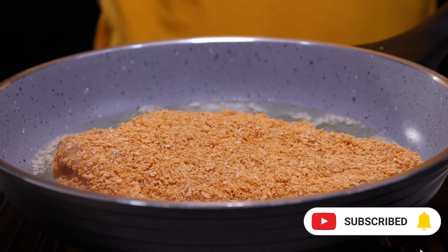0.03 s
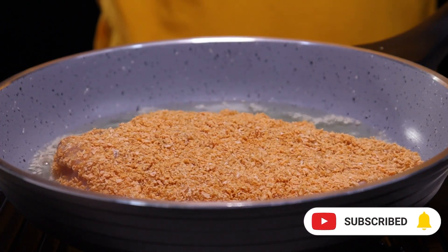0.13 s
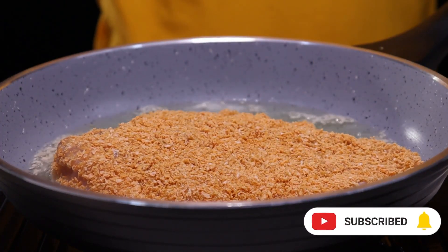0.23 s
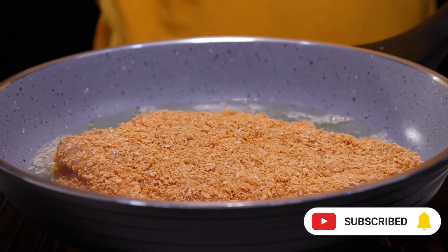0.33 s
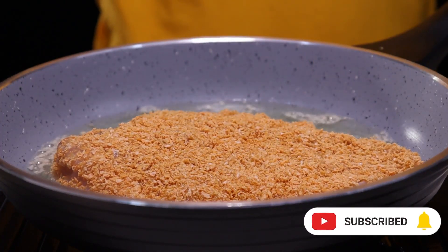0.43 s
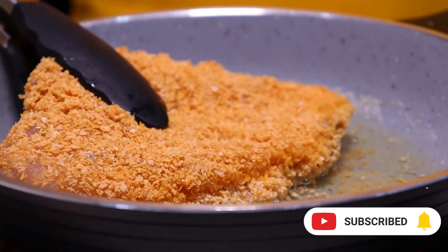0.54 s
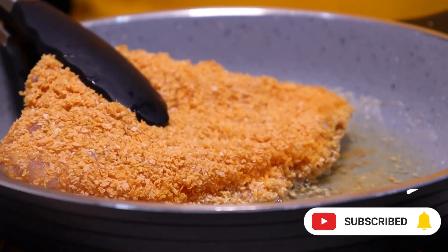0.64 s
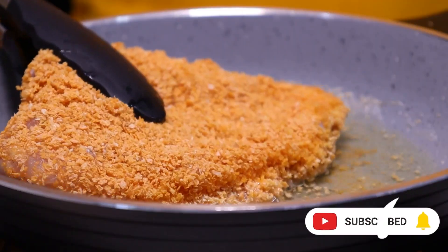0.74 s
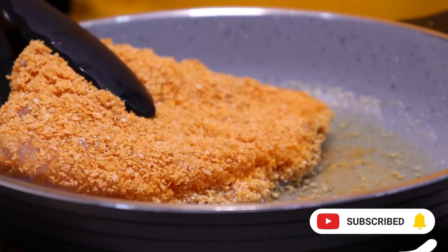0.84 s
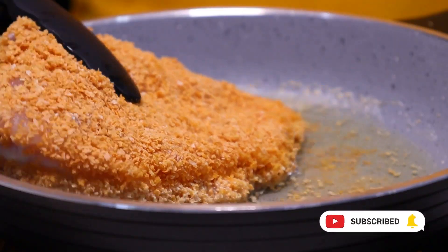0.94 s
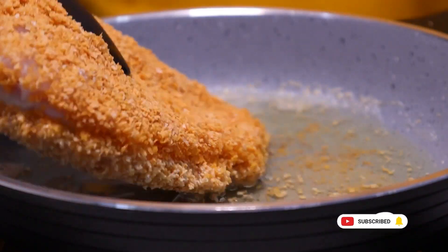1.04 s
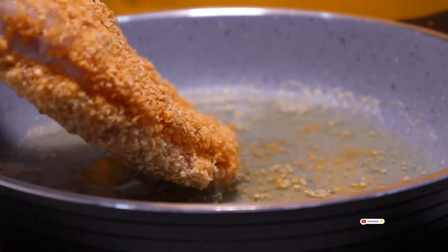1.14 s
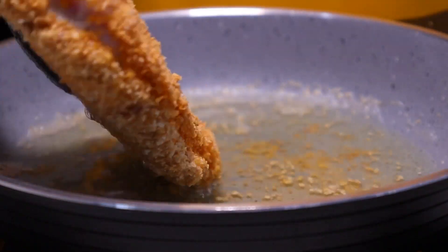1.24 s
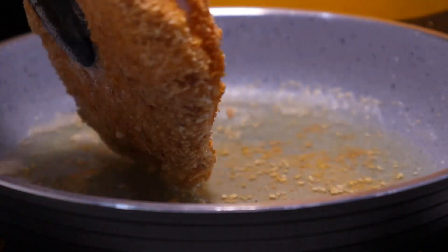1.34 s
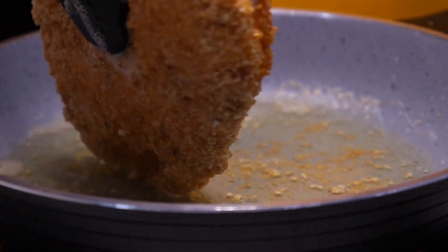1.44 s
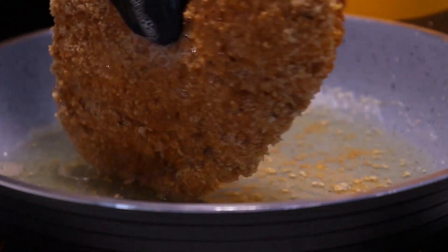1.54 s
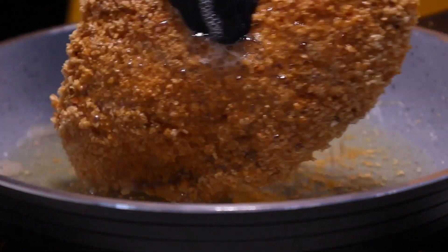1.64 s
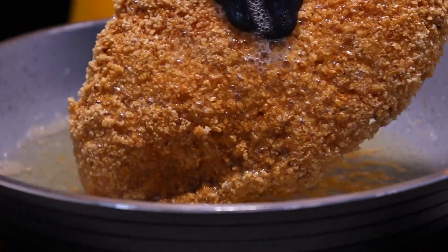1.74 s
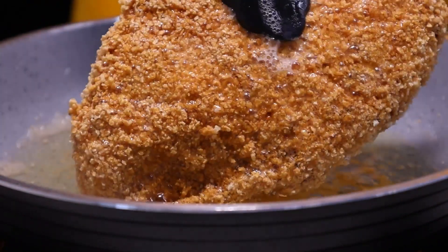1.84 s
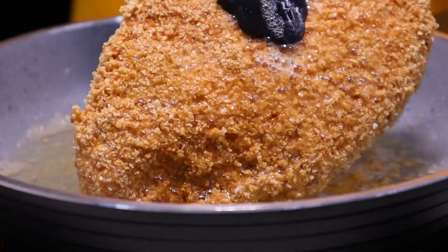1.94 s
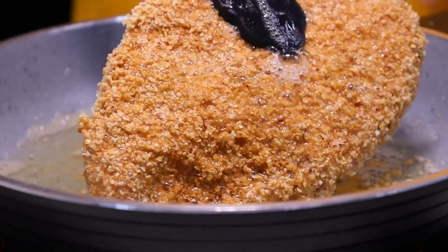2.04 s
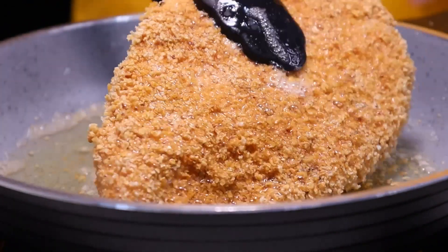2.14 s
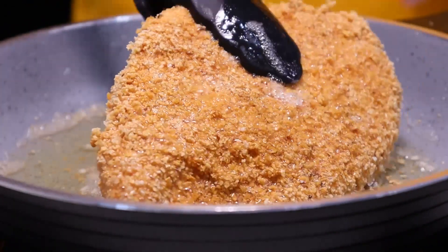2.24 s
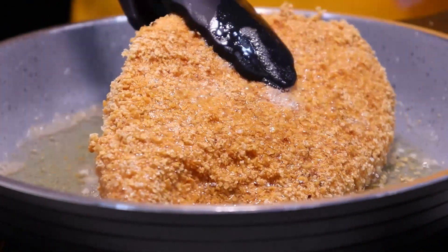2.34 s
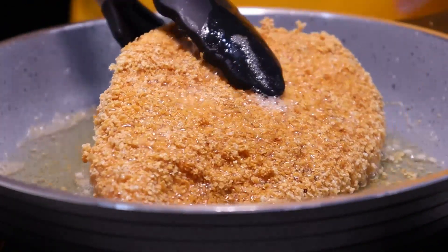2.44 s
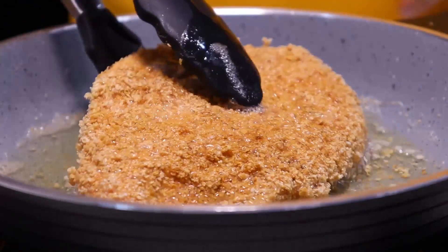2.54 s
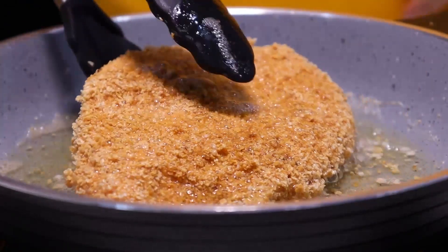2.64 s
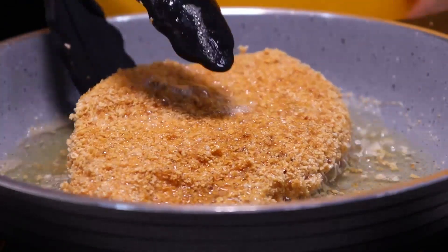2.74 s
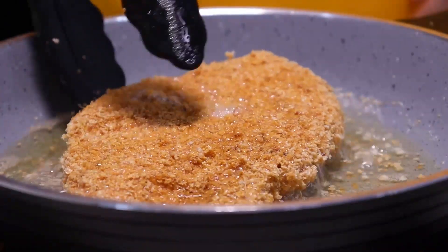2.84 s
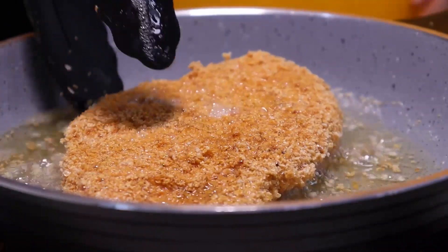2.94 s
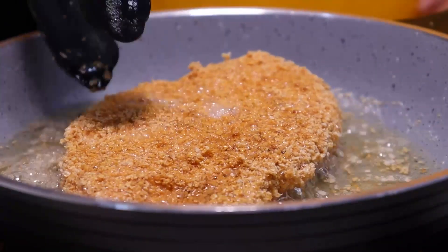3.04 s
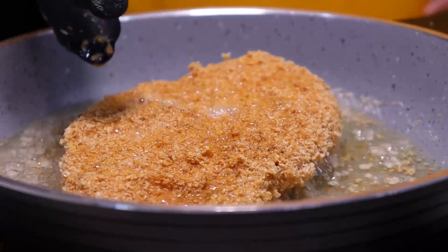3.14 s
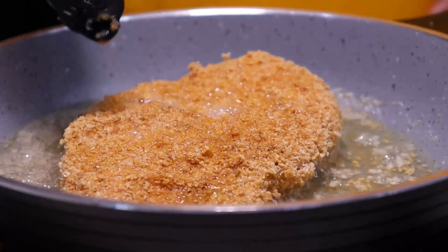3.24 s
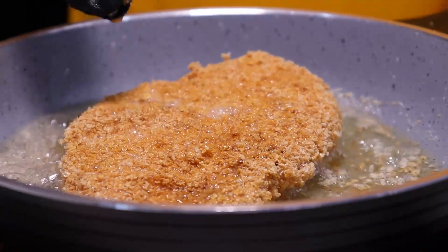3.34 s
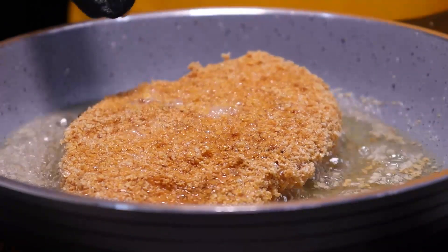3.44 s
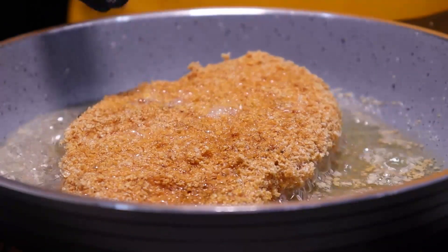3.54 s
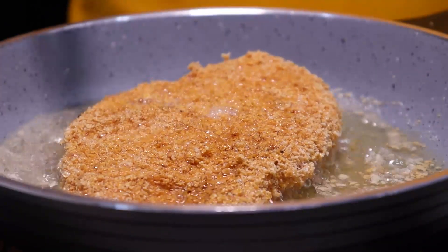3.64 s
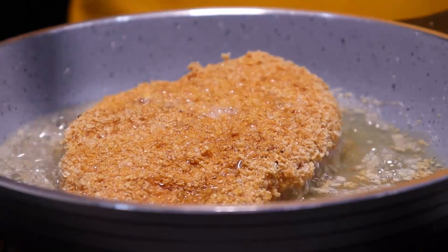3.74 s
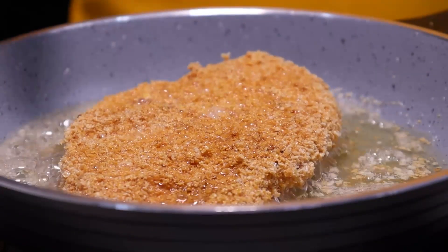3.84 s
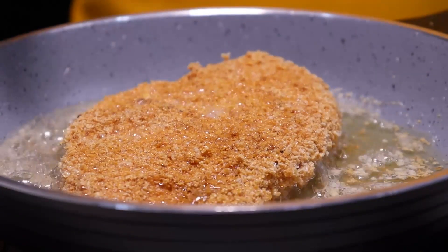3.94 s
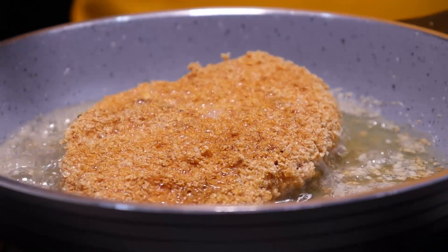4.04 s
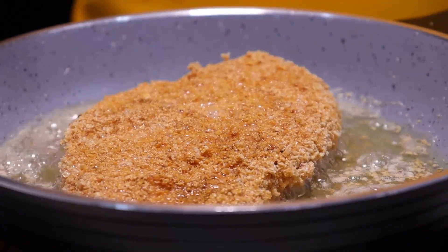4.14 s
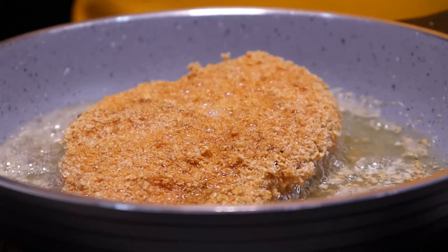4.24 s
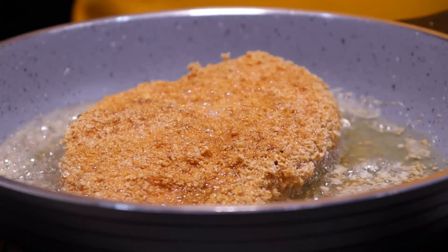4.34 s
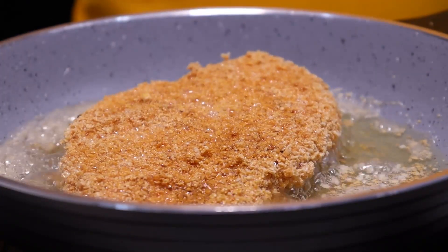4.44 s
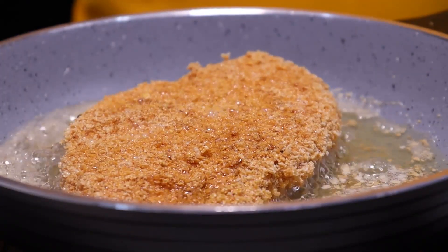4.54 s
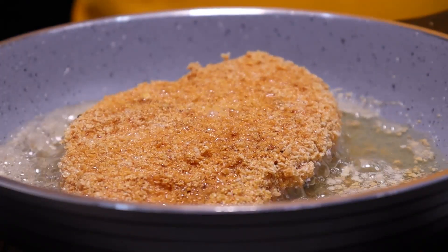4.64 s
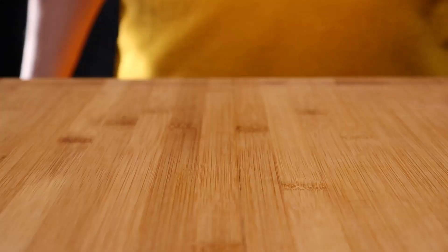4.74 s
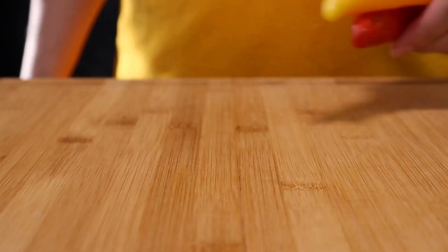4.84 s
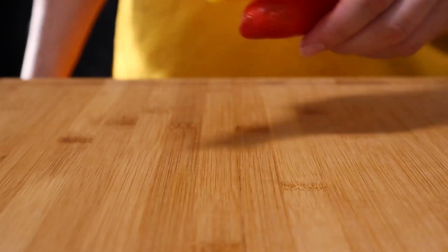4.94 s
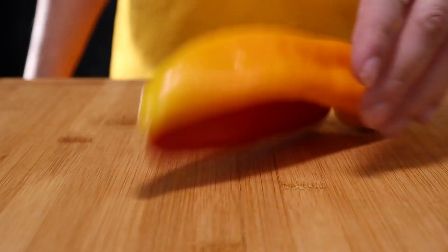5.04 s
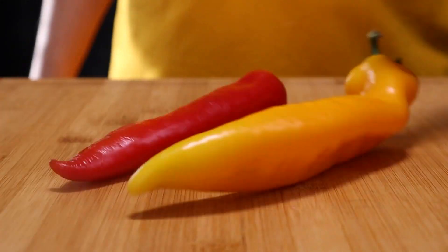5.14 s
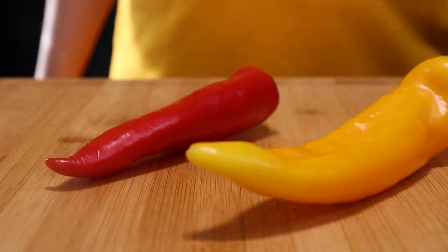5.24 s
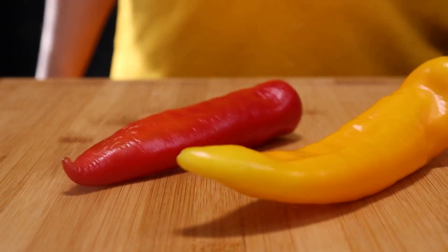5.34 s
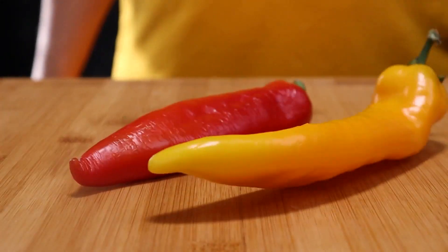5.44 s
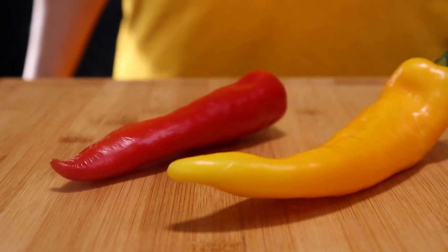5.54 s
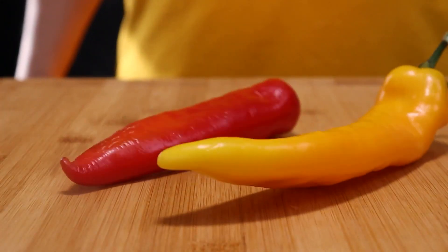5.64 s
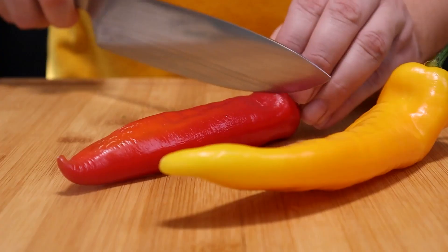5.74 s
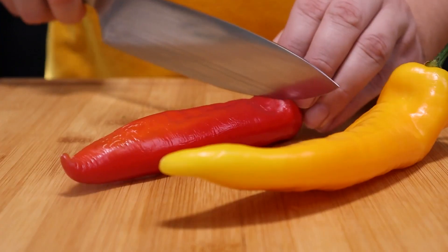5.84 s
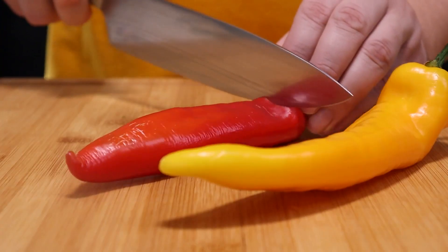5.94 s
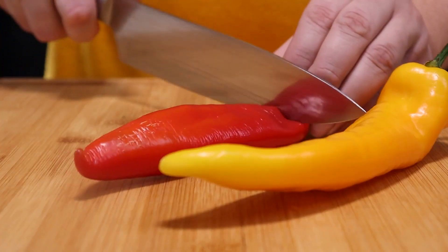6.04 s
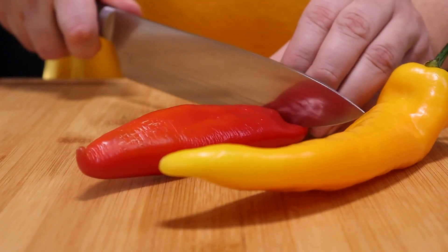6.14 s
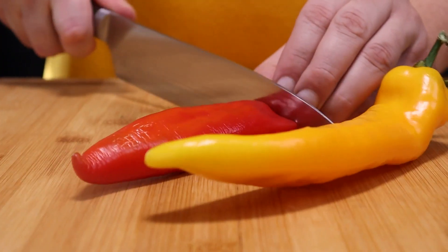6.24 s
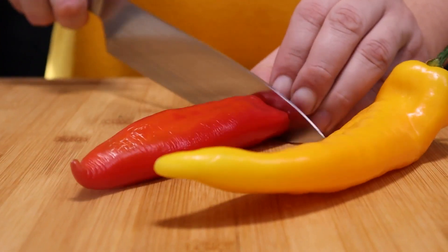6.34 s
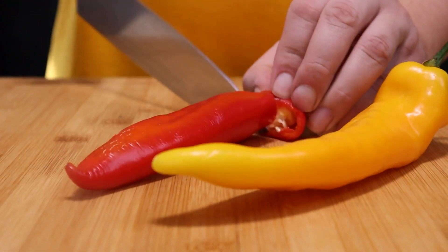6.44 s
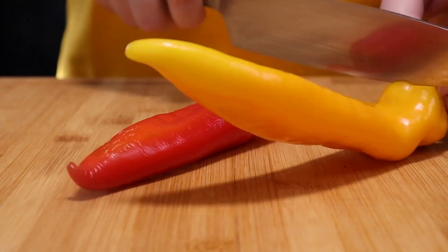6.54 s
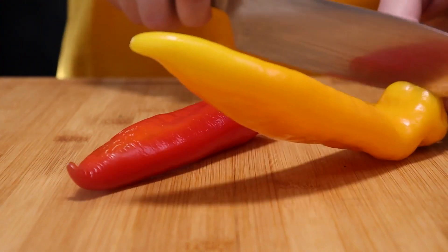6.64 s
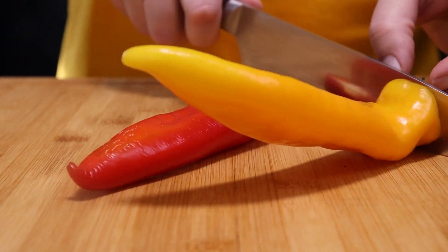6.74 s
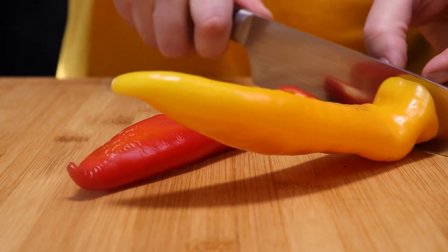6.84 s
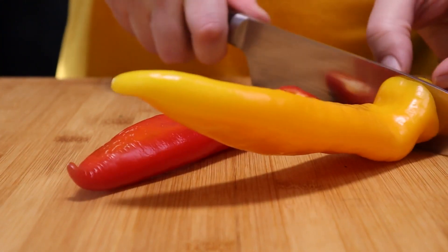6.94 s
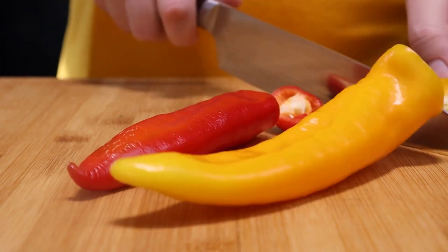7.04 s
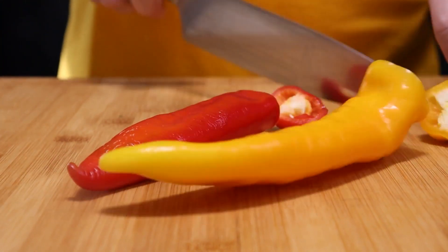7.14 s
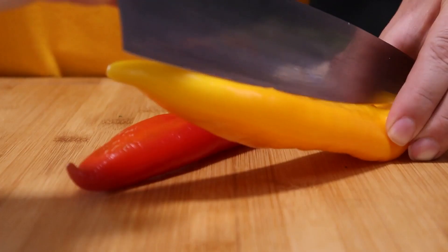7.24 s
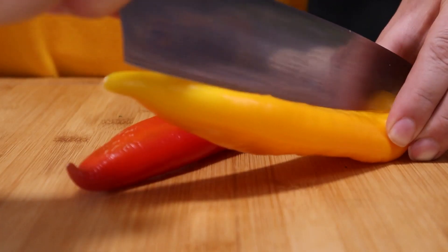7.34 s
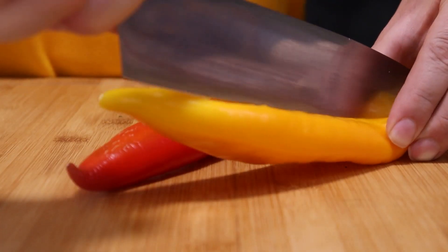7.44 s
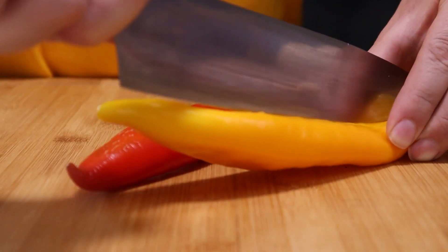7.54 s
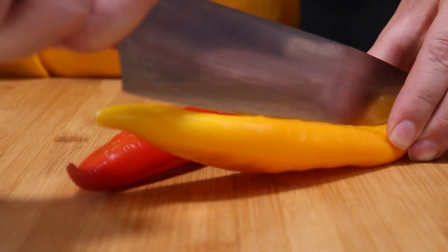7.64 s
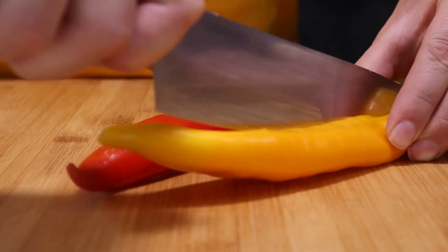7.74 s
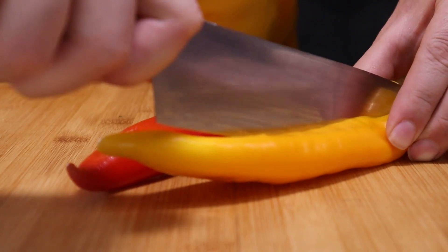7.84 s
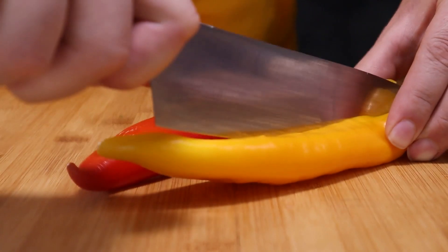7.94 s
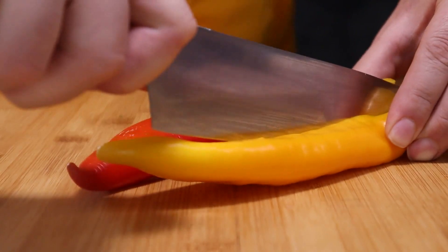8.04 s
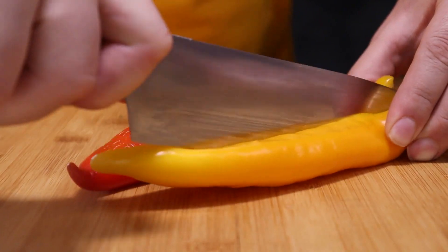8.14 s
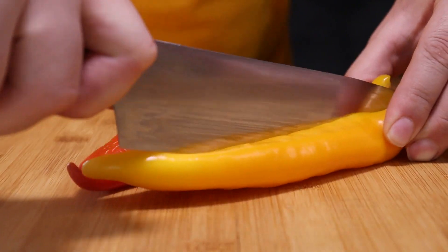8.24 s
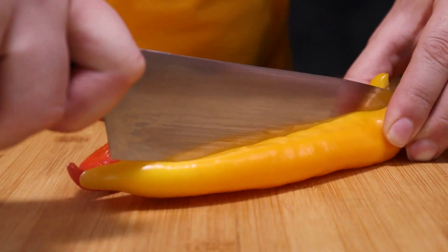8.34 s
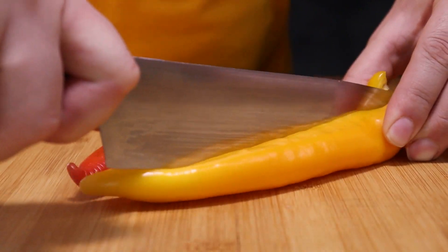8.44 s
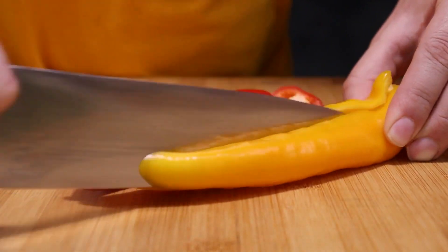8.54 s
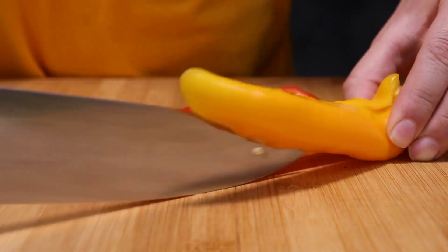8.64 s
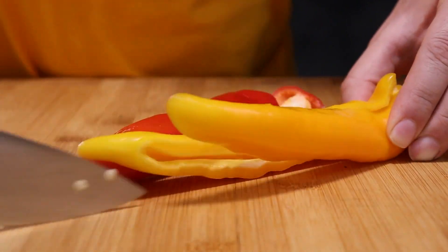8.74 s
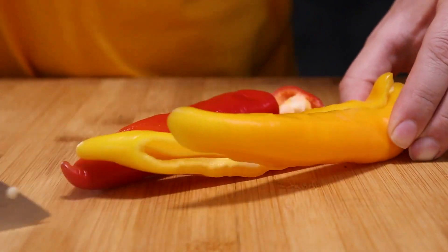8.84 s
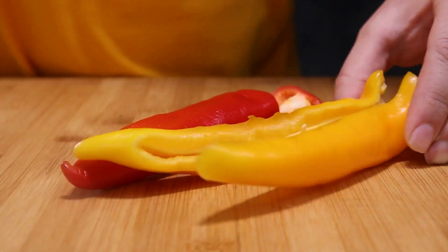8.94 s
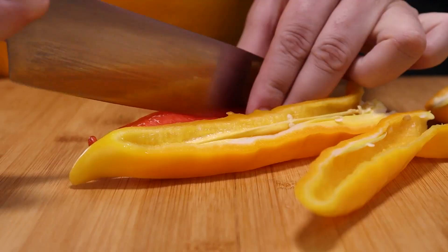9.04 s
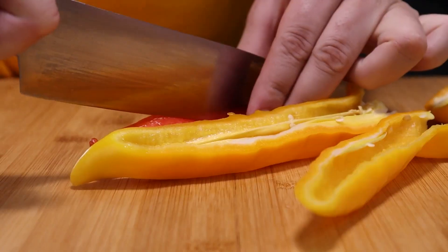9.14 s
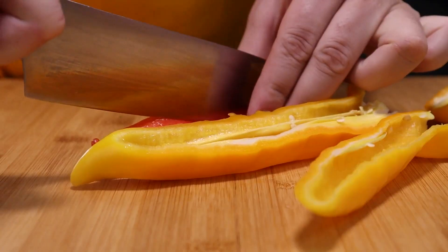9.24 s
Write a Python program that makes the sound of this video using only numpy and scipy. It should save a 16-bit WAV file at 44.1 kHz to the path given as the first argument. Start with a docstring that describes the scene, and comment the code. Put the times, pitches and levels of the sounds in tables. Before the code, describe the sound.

Close-up kitchen sounds: lively frying crackle with popping bubbles, a sudden cut, soft vegetable thuds, then crisp pepper slicing with sharp knife clacks on wood.

```python
"""A quiet kitchen, heard close: a breaded fillet is turned in hot oil, then two peppers are cut on a board.
The frying is filtered random clicks (churn, crackle, spray) with ringing bubbles and short spits on top.
The peppers slap the wood and set the counter booming; board and knife are struck modes.
Crunches are runs of filtered clicks, and the blade's slides are friction grains singing in steel and hollow.
A room hush and a low wavering hum run throughout."""
import sys
import numpy as np
from scipy import signal
from scipy.fft import rfft, irfft
from scipy.io import wavfile

SR = 44100
rng = np.random.default_rng(int(sys.argv[2]) if len(sys.argv) > 2 else 0)


def generate_wav(signal):
    """Clip the signal to [-1, 1] and save it as 16-bit WAV at the path in sys.argv[1]."""
    frames = np.transpose(np.atleast_2d(signal))
    scaled = np.clip(frames, -1, 1) * 32767
    pcm = np.round(scaled).astype(np.int16)
    wavfile.write(sys.argv[1], SR, pcm)


N = 409688
T = np.arange(N) / SR   # time, s

# Hush of the room. Each row: frequency in Hz, relative level in dB.
ROOM_SPECTRUM = [(15, -50), (25, -30.5), (69, -6.5), (89, -8.5), (104, -27), (119, -13.5), (198, -25.5),
                 (260, -19.5), (281, -38.5), (313, -22), (871, -36), (15500, -40)]
ROOM_RMS_DB = -60.5
# Colour of the kitchen's echo. Each row: frequency in Hz, relative level in dB.
ECHO_SPECTRUM = [(80, 4.5), (300, -2), (900, -5.5), (1400, -1.5), (2200, -11), (3500, -8.5), (6000, -3),
                 (9000, -9), (16000, -2)]

# Vigour of the frying. Each row: time in seconds, crackle level in dB, fine spray level in dB.
FRYING_VIGOUR = [(0.72, -40.5, -47), (0.77, -41, -47.5), (1.23, -44, -42.5), (1.43, -39, -40.5),
                 (1.63, -41, -37), (1.82, -39.5, -37.5), (2.35, -41.5, -41.5), (2.91, -38, -40),
                 (3.84, -36.5, -39.5), (4.62, -38, -41.5)]
# Spectra of oil churn, crackle and fine spray. Each row: frequency in Hz, relative level in dB.
CHURN_SPECTRUM = [(25, -34), (60, -17), (120, -1), (200, 1.5), (420, -1.5), (750, -8.5), (1200, -10),
                  (2500, -16.5), (5000, -47)]
CRACKLE_SPECTRUM = [(400, -28), (1000, -14.5), (2200, -11.5), (3100, -5), (4000, -5.5), (5000, 0.5),
                    (6300, 0.5), (7500, -3.5), (11000, -3), (16000, -22.5)]
SPRAY_SPECTRUM = [(2000, -38.5), (6000, -22.5), (8000, 2.5), (10500, 5), (13000, 7), (16000, 5)]
# Gains of four frying layers. Each holds: dB while simmering, dB at usual vigour, dB per dB of vigour.
CHURN_GAIN = (-56.5, -47, 0.17)
BUBBLE_GAIN = (-63, -47.5, 1.4)
CRACKLE_GAIN = (-50.5, -36.5, 1)
SPRAY_GAIN = (-49.5, -37.5, 1.9)
# Biggest bubbles. Each row: burst time in seconds, relative level in dB, pitch in Hz,
# relative ring length in cycles.
BIG_POPS = [(.733, -11, 2240, 1.9), (1.3095, -13, 1500, 7.6), (1.3178, -10.5, 2370, 5),
            (1.403, -9, 2460, 6.9), (1.7452, -6, 1458, 11.6), (1.755, -6.5, 2620, 3.3),
            (2.152, -18, 2100, 6), (2.2562, -16, 2064, 3.7), (2.5141, -11.5, 3780, 15),
            (2.711, -13, 1770, 5), (3.0007, -10, 1960, 3.2), (3.043, 2, 2860, 1.14),
            (3.1562, -7, 3840, 3.4), (3.3593, -18, 3053, 43), (3.4644, -5, 2164, 3.5),
            (3.483, -6.5, 1670, 1.7), (3.7188, -9, 1750, 23), (3.7445, -8, 1410, 16),
            (3.9503, -15, 5990, 25), (4.095, -14, 2170, 17), (4.179, -19.5, 2360, 26),
            (4.342, -10, 2600, 4.3), (4.635, -7, 3010, 4)]
# Loudest drops of oil spitting. Each row: time in seconds, relative level in dB.
OIL_SPITS = [(1.115, -11), (1.3098, -10.5), (1.66, -5), (2.516, -12), (3.041, -12), (3.255, -3),
             (3.376, -8), (3.463, -6.5), (3.71, -3), (3.795, -8), (3.984, -5), (4.662, -3.5)]
# Spectrum of one spit. Each row: frequency in Hz, relative level in dB.
SPIT_SPECTRUM = [(300, -32), (1500, -9), (4000, 1), (6500, 6), (10000, -0.5), (16000, -14)]
# Modes of the metal pan. Each row: frequency in Hz, relative level in dB, t60 in seconds.
PAN_MODES = [(864, -27.5, 0.1), (1390, -24, 0.16), (1980, -26.5, 0.091)]

# Peppers landing and bouncing. Each row: time in seconds, slap peak in dB.
LANDINGS = [(5.15, -15), (5.1601, -11), (5.184, -25), (5.236, -29), (5.295, -23), (5.322, -21.5),
            (5.473, -31.5), (5.502, -31), (5.577, -36), (5.678, -46)]
# Spectrum of a pepper's slap. Each row: frequency in Hz, relative level in dB.
FLESH_SPECTRUM = [(60, -20.5), (200, -10), (400, -4.5), (600, -2), (850, -12.5), (1200, -12.5), (1700, -19),
                  (3000, -17), (5000, -25), (15000, -39)]
# Modes of the counter under a soft weight. Each row: frequency in Hz, relative level in dB, t60 in seconds.
COUNTER_MODES = [(75.6, -10.5, 0.82), (133, -9.5, 0.37), (195, -29, .1), (278.7, -2.5, 0.18),
                 (374, -1, 0.074)]

# Blade sliding through flesh or over wood. Each row: time of the height in seconds, length in seconds,
# relative level in dB, hollow pitch at the height in Hz, relative steel level in dB.
BLADE_SLIDES = [(6.137, 0.35, -54, 1254, -2), (6.531, 0.32, -51, 2920, -1), (6.798, 0.15, -40, 832, -11),
                (7.121, 0.17, -39.5, 902, 0), (7.544, 0.062, -53, 916, -17), (7.767, 0.085, -44, 880, -7.5),
                (8.174, 0.17, -40, 1114, -17.5), (8.369, 0.17, -46.5, 1290, -7.5),
                (8.791, 0.36, -43, 4330, -2), (9.129, 0.12, -51, 1290, -7)]
# Spectrum of the rubbing. Each row: frequency in Hz, relative level in dB.
RUB_SPECTRUM = [(100, -18.5), (300, -7), (800, 1.5), (1500, -3), (2200, 3), (4000, -2), (6000, -0.5),
                (7200, -13), (11000, -11), (16000, -11)]
# Modes of the steel blade. Each row: frequency in Hz, relative level in dB, t60 in seconds.
BLADE_MODES = [(2170, 6, 0.013), (3310, -1, 0.02), (5600, -6, 0.041), (6200, -10, .05),
               (7380, -10.5, 0.091), (8900, -2, 0.035), (10000, -6.5, 0.045), (11760, -6, 0.036),
               (13900, -4.5, .03)]
# Loudest snaps of pepper skin. Each row: time in seconds, relative level in dB.
SKIN_SNAPS = [(6.092, -22.5), (6.137, -12), (6.246, -21.5), (6.287, -12), (6.451, -22), (6.812, -19.5),
              (7.324, -22), (7.485, -27.5), (7.557, -21.5), (7.626, -25), (7.782, -8.5), (7.811, -7),
              (8.389, -27), (8.536, -17.5), (8.563, -13.5), (8.607, -15), (8.675, -12), (8.698, -10.5),
              (9.245, -39)]
# Runs of tearing cells. Each row: time of the height in seconds, length in seconds, level in dB,
# relative treble level in dB.
CELL_RUNS = [(6.137, 0.051, -35, 8), (6.285, 0.04, -32, -7), (6.769, 0.041, -33.5, -3.5),
             (6.82, 0.04, -33, -4.5), (7.557, 0.041, -47, 7), (7.799, 0.037, -21, -10.5),
             (8.641, 0.24, -36, -3)]
# Spectrum of tearing skin and cells. Each row: frequency in Hz, relative level in dB.
SKIN_SPECTRUM = [(100, -14.5), (400, -0.5), (700, -2), (1000, 3.5), (1600, -0.5), (2300, 2), (4000, 0.5),
                 (6000, 0.5), (7800, -6.5), (11000, -8.5), (16000, -14.5)]
# Blade meeting the board. Each row: time in seconds, relative level in dB, blade ring in Hz,
# relative edge click in dB, relative overtone in dB, last crunch level in dB.
BOARD_CHOPS = [(6.3156, -0.5, 2100, 3.5, 1.5, -29), (6.8574, -2.5, 2266, -4, -15, -27),
               (7.8144, -5, 2240, -9, -20, -21), (8.5663, -4, 2130, -10.5, -9, -27)]
# Light taps on the board. Each row: time in seconds, relative level in dB.
BOARD_TAPS = [(6.614, -30), (7.1211, -22), (7.147, -21.5), (7.219, -27), (7.524, -34.5), (8.179, -30),
              (8.697, -22.5)]
# Modes of the board. Each row: frequency in Hz, relative level in dB, t60 in seconds.
BOARD_MODES = [(133, -24, 0.065), (259, -37, 0.022), (349, -40, 0.024), (458, -25.5, 0.098),
               (588, -16, 0.037), (720, -16, 0.027), (955, -3, 0.018), (1093, -15.5, 0.027),
               (1301, -10, 0.025), (1927, -12, 0.031), (2710, -1, 0.0086), (3207, -17.5, 0.033),
               (5820, -16, 0.016)]

FRY_START_S, FRY_END_S = 0.575, 4.778   # the hard frying; before it the oil only simmers
USUAL_VIGOUR_DB = -39
TURNED_S, WET_SIDE_DB_PER_S = 3.5, 5   # once the wet side lies in the oil, the bubbling grows
LESSER_POPS_PER_S, LESSER_POPS_RMS_DB, LESSER_POPS_DB_PER_DB = 26, -42.5, 1.6   # at usual vigour
MIN_CYCLES, DRY_EXTRA_CYCLES, WET_EXTRA_CYCLES = 3, 6.3, 35   # extras are upper limits
WETTING_S = 0.76
SLAP_HZ, SLAP_OCTAVES_PER_DB = 4500, 0.15   # slap cut-off at 0 dB
BOOM_DB = -12   # counter peak re slap peak
SLIDE_RISE_SHARE, CRUNCH_RISE_SHARE = 0.5, 0.56   # of the length
GLIDE_OCTAVES_PER_S = 2.5
HOLLOW_DB, HOLLOW_DB_PER_OCTAVE = 1, -1.5   # at 1 kHz; a smaller hollow sings more weakly
BREAK_RISE_S, BREAK_FALL_S, BREAK_TREBLE_DB = 0.02, 0.005, -10.5   # the last wall gives way
CUTOFF_HZ = 15900


def from_db(db):
    """Decibels to gain."""
    return 10 ** (np.asarray(db) / 20)


def rms_one(x):
    """Scale to unit power."""
    return x / np.sqrt(np.mean(x ** 2) + 1e-20)


def drift(per_s):
    """Slow chance with unit rms: random points joined by lines."""
    return rms_one(np.interp(T * per_s, np.arange(4000), rng.standard_normal(4000)))


def through(x, response):
    """Pass a sound through an impulse response."""
    return signal.oaconvolve(x, response)[:N]


def cut(x, hz, kind, order=2):
    """A low-pass or high-pass filter."""
    return signal.sosfilt(signal.butter(order, hz, kind, fs=SR, output="sos"), x)


def shape(spectrum, size=4096):
    """Causal (minimum-phase) impulse response with this spectrum; peak 1."""
    hz, db = np.transpose(spectrum)
    grid_hz = np.maximum(np.fft.rfftfreq(size, 1 / SR), 1)
    grid_db = np.interp(np.log(grid_hz), np.log(hz), db)
    cepstrum = irfft(np.log(from_db(grid_db)))
    cepstrum[1:size // 2] *= 2   # fold onto the causal half
    response = irfft(np.exp(rfft(cepstrum[:size // 2], size)))
    return response / np.abs(response).max()


def ring(hz, t60_s):
    """A struck mode: a dying sine."""
    t = T[:int(1.3 * t60_s * SR) + 2]
    return np.sin(2 * np.pi * hz * t) * from_db(-60 * t / t60_s)


def add(track, s, sound):
    """Mix a sound in at a given time."""
    at = round(s * SR)
    track[at:at + len(sound)] += sound[:N - at]


def strike(modes, vary_db=0):
    """One blow on a body: its modes ring together, each strength varied at random by vary_db."""
    out = np.zeros(N)
    for hz, db, t60_s in modes:
        add(out, 0, from_db(db + vary_db * rng.standard_normal()) * ring(hz, t60_s))
    return out[:SR]


def grains(per_s, spread_db):
    """Random clicks, many small and a few large; rms 1."""
    size_db = spread_db * np.minimum(rng.exponential(1, N), 4.5)
    sizes = from_db(size_db) * rng.choice([-1, 1], N)
    return rms_one(sizes * (rng.random(N) < per_s / SR))


def scatter(db, t60_s, size=2048):
    """A direct path followed by dense reflections from nearby surfaces."""
    response = rng.standard_normal(size) * from_db(-60 * T[:size] / t60_s)
    response *= from_db(db) / np.linalg.norm(response)
    response[0] = 1
    return response


def swell(s, rise_s, fall_s):
    """A smooth hump that is 20 dB down at the ends of its rise and fall."""
    distance = (T - s) / np.where(T < s, rise_s, fall_s)
    return from_db(-20 * np.minimum(distance ** 2, 10))


def kitchen(x, wet_db, t60_s, treble_t60_s):
    """A diffuse tail that builds up briefly and loses its treble first."""
    t, noise = T[:SR], rng.standard_normal(SR)
    low = signal.sosfiltfilt(signal.butter(1, 3500, fs=SR, output="sos"), noise)
    tail = low * from_db(-60 * t / t60_s) + (noise - low) * from_db(-60 * t / treble_t60_s)
    tail = through(tail * (1 - np.exp(-t / 0.0038)), shape(ECHO_SPECTRUM))
    return from_db(wet_db) * through(x, tail / np.linalg.norm(tail))


def room_tone():
    """Hush of the room: shaped noise, one in the centre and a weaker one in antiphase left and right."""
    response = shape(ROOM_SPECTRUM)
    centre, wide = [rms_one(through(rng.standard_normal(N), response)) for _ in range(2)]
    return from_db(ROOM_RMS_DB) * (centre + from_db(-15.0) * wide * [[1], [-1]])


def hum():
    """A low sine wavering at random in level and phase."""
    return from_db(-63.0 + 2.9 * drift(13)) * np.sin(2 * np.pi * 74 * T + .7 * drift(22))


def loudness(layer, vigour_db):
    """Gain of one frying layer: steady while the oil simmers, then following the vigour."""
    simmer_db, usual_db, db_per_db = layer
    frying_db = usual_db + db_per_db * (vigour_db - USUAL_VIGOUR_DB)
    return from_db(np.where(T < FRY_START_S, simmer_db, frying_db))


def bubbles(per_s, spread_db, low_hz, high_hz, cycles, count=16):
    """Small bubbles burst at random, each ringing for a few cycles at the pitch of its size."""
    bursts, dealt = grains(per_s, spread_db), rng.integers(0, count, N)
    out = np.zeros(N)
    for k, hz in enumerate(np.geomspace(low_hz, high_hz, count)):
        out += through(bursts * (dealt == k), ring(hz, cycles / hz))
    return rms_one(out)


def fizz(spectrum, per_s, spread_db, hiss_db, ringing_db):
    """Steam escaping through the crust: dry ticks, tiny ringing bubbles and the blur of countless smaller ones."""
    ticks = grains(per_s * from_db(2 * drift(40)), spread_db)
    ringing = bubbles(per_s=1800, spread_db=4.5, low_hz=3000, high_hz=14500, cycles=13)
    hiss = rng.standard_normal(N)
    mix = ticks + from_db(ringing_db) * ringing + from_db(hiss_db) * hiss
    return rms_one(through(mix, shape(spectrum)))


def pops():
    """Big bubbles crack and ring, too small to radiate bass; low, loud ones ring the pan most; drops spit."""
    out, kicks, spit = np.zeros(N), np.zeros(N), shape(SPIT_SPECTRUM)
    for s, db, hz, cycles in BIG_POPS:
        burst = signal.convolve(ring(hz, .8 * cycles / hz), scatter(db=-9, t60_s=.025))
        add(out, s, from_db(db + 6.5) * cut(burst, 0.54 * hz, "high"))
        add(out, s, from_db(db - 16.5) * spit)
        add(kicks, s, from_db([db]) * min(1400 / hz, 1) ** 4)
    for s, db in OIL_SPITS:
        add(out, s, from_db(db - 1) * signal.convolve(spit, scatter(db=0, t60_s=0.005)))
    return out + cut(through(kicks, strike(PAN_MODES)), 500, "high")


def lesser_pops(vigour_db):
    """Middling bubbles burst singly: dry cracks at first, clear pings once the wet side lies in the oil."""
    out, spit = np.zeros(N), shape(SPIT_SPECTRUM)
    span_s = FRY_END_S - FRY_START_S
    for when, size, damping, strength in rng.random((int(LESSER_POPS_PER_S * span_s), 4)):
        s, gain = FRY_START_S + when * span_s, from_db(-9 * strength)
        hz = 2200 * 3.0 ** (size ** 1.26)
        extra = np.interp(s, [TURNED_S, TURNED_S + WETTING_S], [DRY_EXTRA_CYCLES, WET_EXTRA_CYCLES])
        cycles = MIN_CYCLES + damping * extra
        add(out, s, gain * signal.convolve(ring(hz, cycles / hz), scatter(db=-7, t60_s=.025)))
        add(out, s, gain * from_db(-2) * spit)
    out = cut(out, 900, "high")
    level_db = LESSER_POPS_RMS_DB + LESSER_POPS_DB_PER_DB * (vigour_db - USUAL_VIGOUR_DB)
    return from_db(level_db) * out / out[T < FRY_END_S].std()


def frying():
    """The whole pan: oil churning low, bubbles in the middle, crackle and fine spray on top."""
    s, *columns = np.transpose(FRYING_VIGOUR)
    vigour_db, spray_db = [np.interp(T, s, c) for c in columns]
    wet_side = from_db(WET_SIDE_DB_PER_S * np.maximum(T - TURNED_S, 0))
    churn = rms_one(through(grains(per_s=7500, spread_db=4.0), shape(CHURN_SPECTRUM)))
    bubbling = cut(bubbles(per_s=700, spread_db=4.5, low_hz=1670, high_hz=3400, cycles=34), 700, "high")
    crackle = fizz(CRACKLE_SPECTRUM, per_s=1100, spread_db=5.0, hiss_db=-11, ringing_db=1.5)
    spray = fizz(SPRAY_SPECTRUM, per_s=590, spread_db=7.5, hiss_db=-11.0, ringing_db=4.5)
    out = loudness(CHURN_GAIN, vigour_db) * churn
    out += loudness(BUBBLE_GAIN, vigour_db) * wet_side * bubbling
    out += loudness(CRACKLE_GAIN, vigour_db) * crackle
    out += loudness(SPRAY_GAIN, spray_db) * spray
    out += pops() + lesser_pops(vigour_db)
    out += kitchen(out, wet_db=-14.0, t60_s=0.18, treble_t60_s=0.12)
    return out * np.clip((FRY_END_S - T) / 0.0078, 0, 1)   # short fade to silence


def thuds():
    """A pepper slaps the wood, brighter the harder it lands; its weight sets the counter booming."""
    out = np.zeros(N)
    for s, db in LANDINGS:
        soft_hz = min(SLAP_HZ * 2 ** (SLAP_OCTAVES_PER_DB * db), SR / 3)
        slap = signal.convolve(shape(FLESH_SPECTRUM), scatter(db=5, t60_s=.025))
        slap = cut(slap, soft_hz, "low", order=1)
        boom = cut(strike(COUNTER_MODES, vary_db=1.5), 55, "high")
        add(out, s, from_db(db) * slap / np.abs(slap).max())
        add(out, s, from_db(db + BOOM_DB) * boom / np.abs(boom).max())
    return out


def rocking():
    """The peppers wobble to rest on their bumpy skins: sparse soft clicks."""
    bumps = rms_one(through(grains(per_s=170, spread_db=3.0), shape(FLESH_SPECTRUM)))
    return from_db(-62.5) * swell(s=5.45, rise_s=0.084, fall_s=0.51) * bumps


def sliding():
    """Friction grains sing in the steel and in the hollow beside the blade, which closes during the stroke."""
    stick_slip = from_db(2.5 * drift(110))
    friction = grains(per_s=4500, spread_db=4.0) * stick_slip
    rub = rms_one(through(friction, shape(RUB_SPECTRUM)))
    steel = rms_one(through(friction, strike(BLADE_MODES)))
    breadth = rms_one(cut(friction, 160, "low"))
    out = np.zeros(N)
    for s, length_s, db, hz, steel_db in BLADE_SLIDES:
        near = np.abs(T - s) < .45
        t = T[near]
        closing = 2 ** (GLIDE_OCTAVES_PER_S * np.clip(t - s, -.15, .15))
        # a higher resonance is wider in proportion
        hollow = np.interp((t - t[0]) * hz / 1000, T, breadth)
        hollow *= np.sin(2 * np.pi * np.cumsum(hz * closing) / SR)
        hollow_db = HOLLOW_DB + HOLLOW_DB_PER_OCTAVE * np.log2(hz / 1000)
        # the contact travels along the blade and bends its modes a little
        bent = np.interp(t[0] + np.cumsum(closing ** .22) / SR, T, steel)
        # the reflection across the narrowing gap sweeps a comb through the hiss
        swept = rub[near] + .3 * np.interp(t - .0008 / closing, T, rub)
        stroke = swept + from_db(hollow_db) * hollow + from_db(steel_db) * bent
        envelope = swell(s, length_s * SLIDE_RISE_SHARE, length_s * (1 - SLIDE_RISE_SHARE))
        out[near] += from_db(db - 2.0) * envelope[near] * stroke
    return out


def cutting():
    """Skin snaps and cells tear in runs, a last run ending in each knock; taut skin tears brighter than flesh."""
    breaks, tearing = np.zeros((2, N))
    for s, db in SKIN_SNAPS:
        add(breaks, s, from_db(db - 5.0) * scatter(db=9, t60_s=0.013))
    cells = rms_one(through(grains(per_s=3800, spread_db=3.5), shape(SKIN_SPECTRUM)))
    dull = cut(cells, 5000, "low", order=1)
    runs = [(s, length_s * CRUNCH_RISE_SHARE, length_s * (1 - CRUNCH_RISE_SHARE), db, treble_db)
            for s, length_s, db, treble_db in CELL_RUNS]
    runs += [(s, BREAK_RISE_S, BREAK_FALL_S, crunch_db, BREAK_TREBLE_DB)
             for s, *_, crunch_db in BOARD_CHOPS]
    for s, rise_s, fall_s, db, treble_db in runs:
        coloured = dull + from_db(treble_db) * (cells - dull)
        tearing += from_db(db) * swell(s, rise_s, fall_s) * coloured
    return through(breaks, shape(SKIN_SPECTRUM)) + tearing


def fibres():
    """Single fibres tick while the knife works along the pepper; small snaps crowd round each big one."""
    ticks = rms_one(through(grains(per_s=400, spread_db=4.0), shape(SKIN_SPECTRUM)))
    snaps = rms_one(through(grains(per_s=140, spread_db=3.0), shape(SKIN_SPECTRUM)))
    strain = np.max([swell(s, rise_s=0.028, fall_s=0.11) for s, _ in SKIN_SNAPS], axis=0)
    return from_db(-58.5) * swell(s=9.2, rise_s=2.2, fall_s=4.2) * ticks + from_db(-51) * strain * snaps


def chops():
    """The edge hits the wood: a click, a short two-note clack of the knife, the board's knock; also light taps."""
    knife, wood = np.zeros((2, N))
    for s, db, hz, click_db, overtone_db, _ in BOARD_CHOPS:
        add(wood, s, from_db(db + 1) * strike(BOARD_MODES, vary_db=1.2))
        add(knife, s, from_db(db + 9.5) * ring(hz, t60_s=0.0081))
        add(knife, s, from_db(db + overtone_db) * ring(1.58 * hz, t60_s=0.012))
        add(knife, s, from_db(db + click_db) * scatter(db=-2, t60_s=0.0043))
    for s, db in BOARD_TAPS:
        tap = cut(strike(BOARD_MODES, vary_db=6.0), 2500, "low", order=1)
        add(wood, s, from_db(db - 2) * tap)
    return cut(knife, 510, "high") + cut(wood, 350, "high", order=1)


def scene():
    """First the pan, then the board, both dead centre, over the room's hush and hum."""
    pan = frying()
    board = thuds() + rocking() + sliding() + cutting() + fibres() + chops()
    board_echo = kitchen(board, wet_db=-16.5, t60_s=0.34, treble_t60_s=0.15)
    return pan + board + board_echo + hum() + room_tone()


def record(dry):
    """The hardest knocks overload the recorder, softly limited; a steep low-pass cuts the top."""
    clipped = dry / (1 + (dry / .9) ** 8) ** (1 / 8)
    return signal.sosfilt(signal.cheby1(16, .1, CUTOFF_HZ, fs=SR, output="sos"), clipped)


dry = scene()
out = record(dry)
generate_wav(out)
```